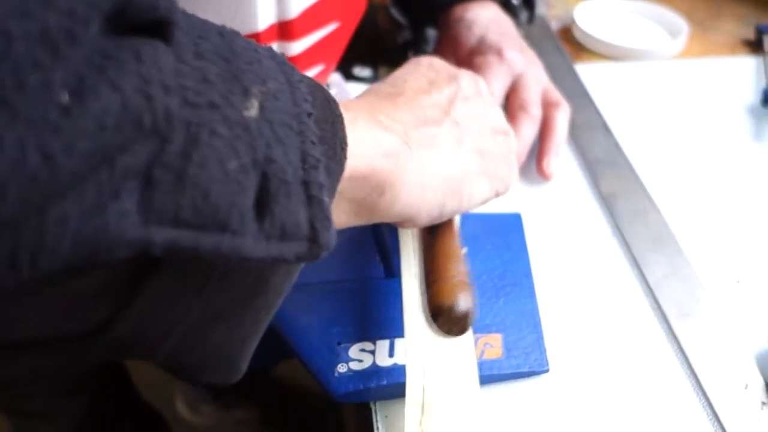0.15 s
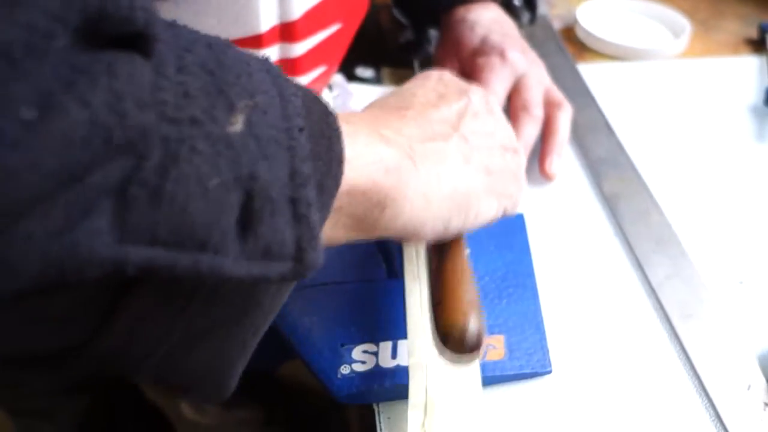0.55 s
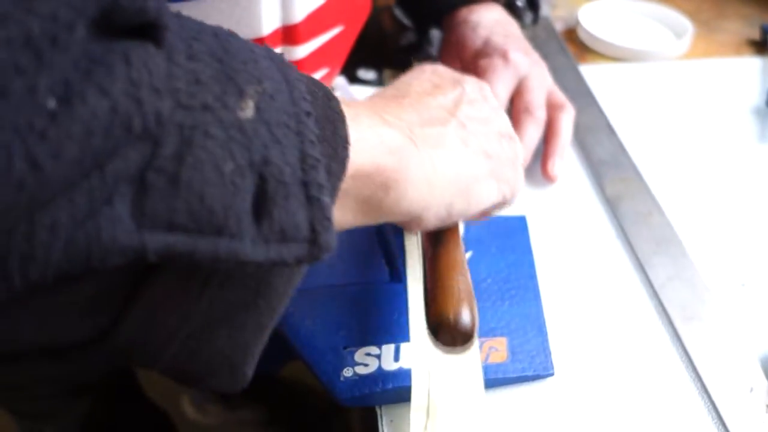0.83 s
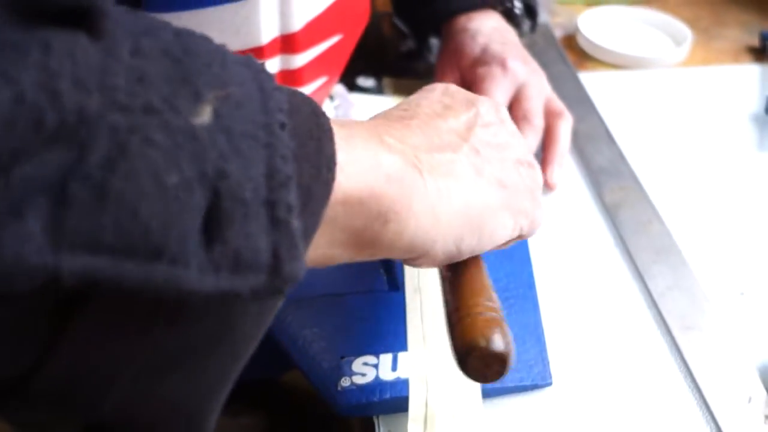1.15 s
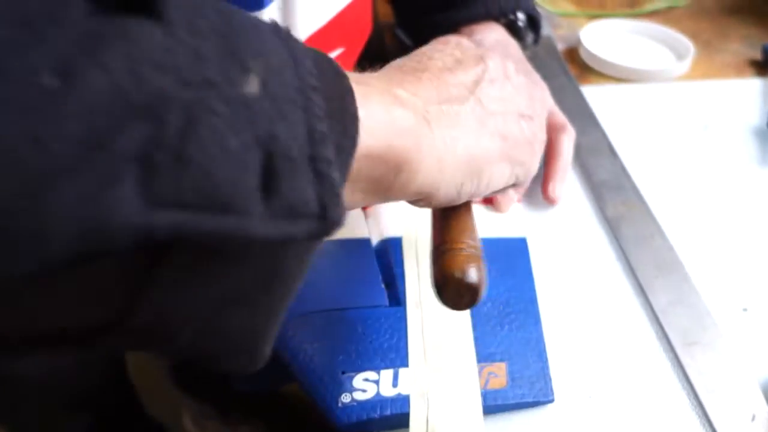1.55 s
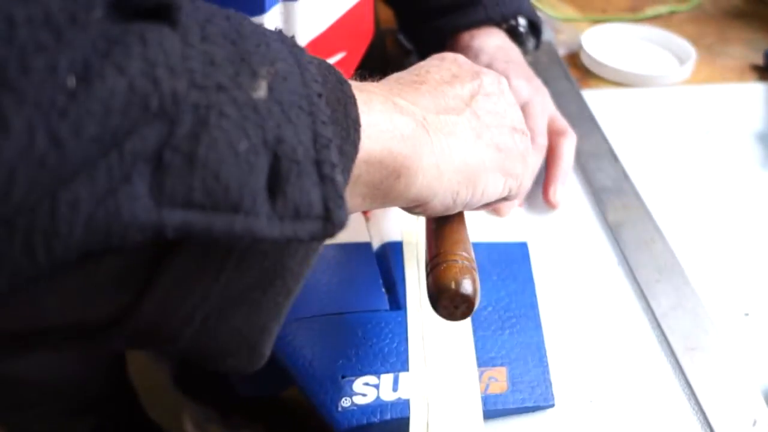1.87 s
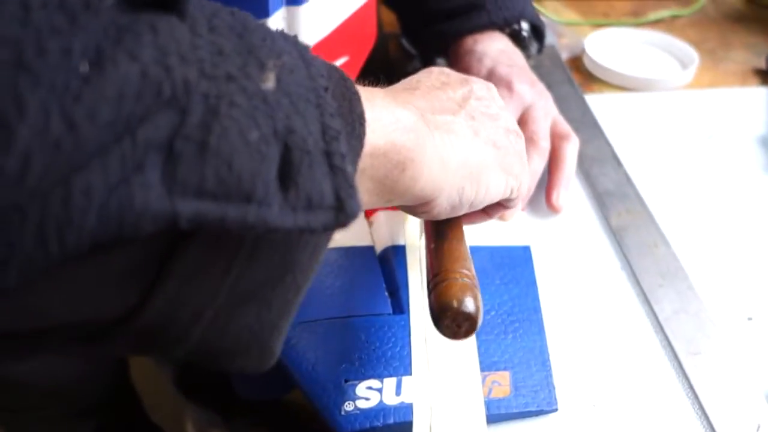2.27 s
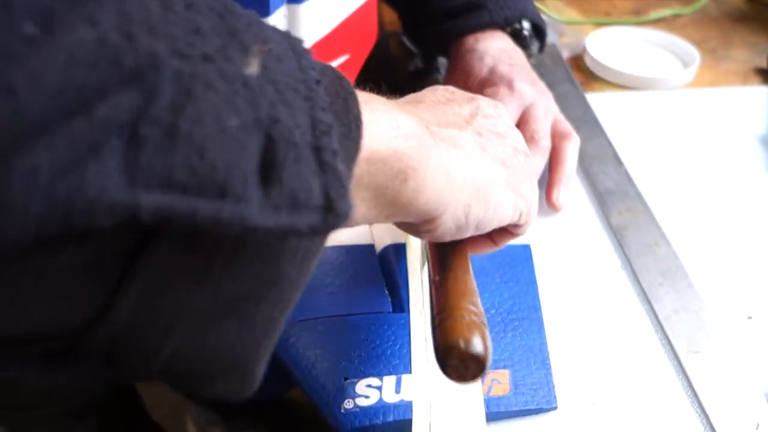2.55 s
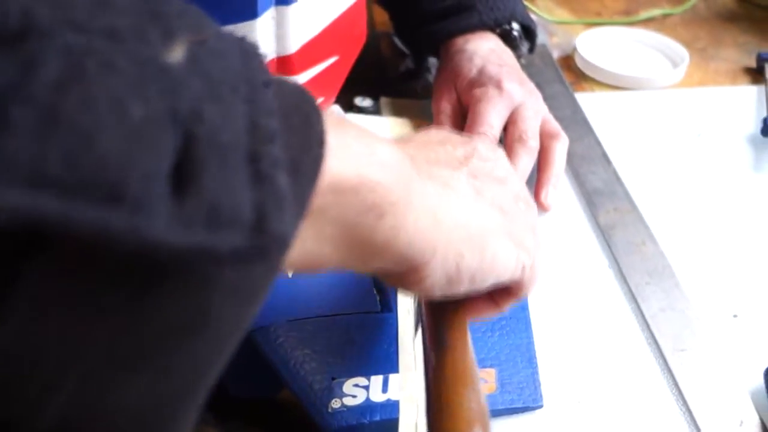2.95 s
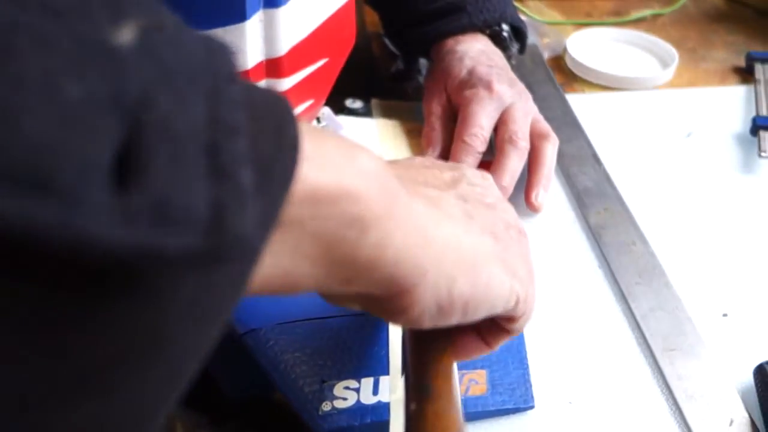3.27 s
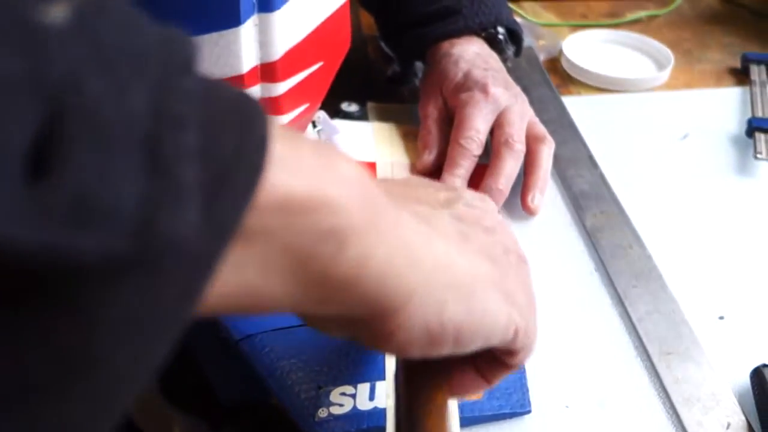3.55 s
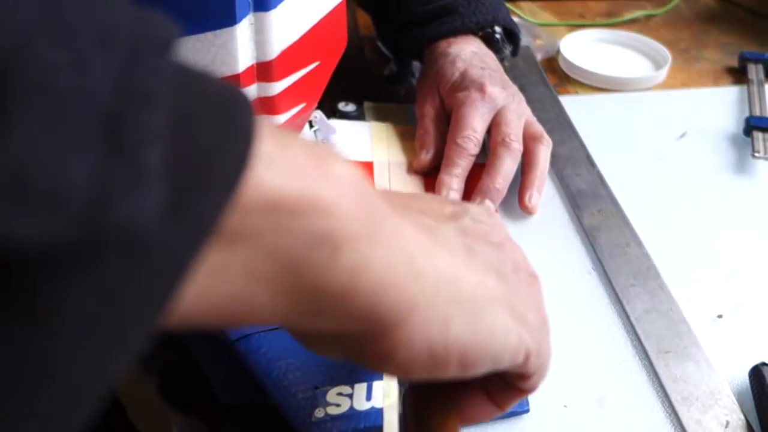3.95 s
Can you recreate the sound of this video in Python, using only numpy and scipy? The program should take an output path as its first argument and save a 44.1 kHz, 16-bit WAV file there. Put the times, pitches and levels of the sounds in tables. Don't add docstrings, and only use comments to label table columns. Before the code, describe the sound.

Bright, dry, grainy saw strokes come first, irregular and fast, with clicks of thin steel against the slot. After about a half-second lull with faint tapping, the blade clatters back in and scrapes more softly and duller, finishing with light pointed scratches and near quiet. Under it lies a faint low engine drone and steady fan hum in a small room, captured closely in stereo.

```python
import sys
import numpy as np
from scipy import signal
from scipy.fft import rfft, irfft, next_fast_len
from scipy.io import wavfile
from scipy.ndimage import uniform_filter1d, map_coordinates

SR = 44100
rng = np.random.default_rng(int(sys.argv[2]) if len(sys.argv) > 2 else 0)


def to_linear_factor(level_db):
    exponent = np.asarray(level_db, float) / 20
    return 10 ** exponent


def master_out(mix):
    frames = np.transpose(np.atleast_2d(mix))
    ceiling = np.clip(frames, -1, 1)
    pcm = np.round(ceiling * 32767).astype(np.int16)
    wavfile.write(sys.argv[1], SR, pcm)


N = 181017
TIME = np.arange(N) / SR

# t/s, f/Hz
FIRING_CYCLE = [(0.0, 19.3), (0.04, 19.2), (0.55, 19.0), (1.54, 19.0), (1.97, 18.7), (2.92, 18.6),
                (3.0, 18.7), (4.1, 19.1)]
# t/s, level/dB
ENGINE_BOOM = [(0, -54.5), (1, -46), (1.6, -47.5), (2, -42.5), (2.5, -45), (3.4, -43.5), (4.1, -48)]
# multiple of the firing cycle [1], level/dB
BOOM_ORDERS = [(5, 0.5), (6, -9)]
# multiple of the firing cycle [1], level/dB
STEADY_ORDERS = [(2, -89), (3, -73), (4, -81), (7, -114), (8, -62.5), (10, -63), (11, -88.5), (12, -76),
                 (14, -65.5)]

# f/Hz, density/dB per Hz
FLOOR_SPECTRUM = [(25, -10), (43, -17), (79, -6), (104, -3), (178, -10.5), (260, -14), (445, -23),
                  (722, -37), (1800, -30.5), (2600, -34.5), (3170, -42), (9810, -45.5), (13900, -55),
                  (15500, -80)]
# f/Hz, likeness [0..1]
FLOOR_LIKENESS = [(60, 1.0), (240, 1), (950, 0.41), (3770, 0.041), (15000, 0.01)]

# start/s, fastest/s, stop/s, hiss level/dB, pressure on the block/dB
STROKES = [(-.04, 0, 0.079, -39, 3), (0.054, 0.163, .24, -34, -2), (0.207, 0.26, .3, -38, -6.5),
           (0.268, 0.307, 0.35, -45, -2.5), (0.466, 0.518, 0.59, -31.5, -3),
           (0.591, 0.608, 0.63, -37.5, -8.5), (0.596, 0.699, .76, -36.5, -2),
           (0.806, 0.834, 0.88, -44, -1.5), (0.895, 1.011, 1.223, -33.5, -3.5),
           (0.968, 1.036, 1.105, -32.5, 1), (1.188, 1.224, 1.277, -36.5, -8),
           (1.276, 1.324, 1.37, -35.5, -8), (1.29, 1.375, 1.4, -34, -4)]
GROOVE_CUTS = [
    (2.192, 2.23, 2.27, -43.5, -10),
    (2.282, 2.3, 2.312, -46, -13),
    (2.314, 2.348, 2.38, -41, -13),
    (2.34, 2.403, 2.546, -39, -6),
    (2.426, 2.579, 2.686, -38, -2.5),
    (2.56, 2.725, 2.94, -40, 0),
    (2.788, 2.883, 3.027, -39.5, -3),
    (2.938, 3.053, 3.253, -39.5, -5.5),
    (3.098, 3.165, 3.273, -41, -2.5),
]
RESTING_CONTACT = [(.32, .37, 0.81, -65.5, 1), (.72, .77, 1.2, -66, 1), (1.115, 1.197, 1, -59, -18),
                   (1.23, 1.275, 1.46, -47, -4.5), (1.358, 1.4, 1.67, -63, 5.5),
                   (2.2, 2.293, 2.38, -57, -3), (3.297, 3.456, 3.6, -52.5, -1), (3.618, 3.74, 3.74, -53, 0),
                   (3.867, 3.93, 4.46, -69.5, 5)]
JABS = [(3.187, 3.317, 3.39, -50, -1.5), (3.344, 3.397, 3.456, -39, -2.5), (3.447, 3.512, 3.66, -44.5, -5),
        (3.53, 3.62, 3.75, -37.5, 0.5), (3.734, 3.837, 3.89, -41, -2), (3.81, 3.877, 3.95, -42, 0)]
# t/s, blade depth in slot/dB, hand weight on table/dB, free length of block/dB
SAW_POSE = [(0, 4, -8, -0.5), (.25, -7, -21, -3.5), (.55, -7, -8, -0.5), (1.05, -5.5, -8, 1.5),
            (1.24, -7, -12.5, 5), (1.35, -6.5, -18, -0.5), (2.25, -14, -9, 2.5), (2.55, -8, -19, -4),
            (2.75, -6, -8.5, -2.5), (3.05, -3.5, -6, -2.5), (3.22, 0.5, -0.5, 2), (3.4, 3, 1.5, 1),
            (3.62, 3.5, -4, 1.5), (3.72, 4, 5, 6.5), (3.85, 1.5, -1, 1.5)]

# f/Hz, density/dB per Hz
TEARING_SPECTRUM = [(1470, -32), (2500, -10), (2980, -19.5), (3840, -19), (4410, -13), (6990, -2),
                    (9360, -0.5), (11900, -3.5), (14700, -9.5), (15700, -11)]
# f/Hz, width/Hz, level/dB
BLADE_MODES = [(6050, 400, -0.5), (6870, 160, 6.5), (8560, 240, -1.5), (9600, 81, 4), (11470, 910, -7)]
# f/Hz, width/Hz, level/dB
GROOVE_MODES = [(3627, 460, 0), (4280, 410, 8), (5070, 1130, 0)]
# f/Hz, width/Hz, level/dB
BLOCK_MODES = [(820, 195, -3.5), (1266, 192, -0.5), (1703, 214, 0.5), (2280, 304, 1.5), (2892, 550, -2)]
# f/Hz, width/Hz, level/dB
TABLE_MODES = [(59, 23.5, -4.5), (130, 32, -4.5), (197, 75, -5), (286.8, 25, 4.5), (408.5, 97, -8.5)]

# t/s, peak level/dB, block part/dB
BLADE_TICKS = [(.0014, -9.5, 2), (.416, -36, -20), (.6, -21, -6), (.6055, -10, -18), (.7117, -14, -21),
               (.8116, -19.5, -11), (.833, -21, -24), (.917, -27.5, -19), (.9348, -18.5, -9),
               (1.2117, -15, -18), (1.2285, -23.5, 1.5), (1.3065, -20, -19), (1.3902, -14.5, -16),
               (2.2064, -31, -20), (2.2967, -22.5, -30), (2.329, -19, -30), (2.485, -41, -4),
               (2.5594, -14, -9), (2.6674, -30.5, 7.5), (2.7328, -22, 0), (2.778, -29, -3),
               (2.997, -17, -5), (3.3959, -28, 0), (3.4994, -28, 7), (3.5628, -24, 3), (3.669, -34, -4),
               (3.7885, -31, -1), (3.8412, -25, 4)]
BLADE_RATTLE = [(2.4, -26, -1), (2.4132, -21, -2), (2.4214, -8, -11.5), (2.4265, -14, -7),
                (2.4301, -16, -9), (2.444, -10.5, -13)]
SOFT_TAPS = [(1.871, -44, 0), (1.881, -47.5, 12), (1.9121, -49, -14), (2.007, -41.5, 8), (2.012, -43, 10),
             (2.0903, -46.5, 5), (2.1161, -45, -4), (2.143, -37.5, -5), (2.1914, -46, 6)]
# f/Hz, width/Hz, level/dB
KNOCK_MODES = [(1284, 79, 5), (1920, 550, 6), (2730, 1200, 5.5), (4570, 1100, 8)]
# f/Hz, width/Hz, level/dB
TAP_MODES = [(895, 120, -1), (1260, 60, 11.5), (1850, 270, 5.5), (2500, 680, -3), (4600, 430, -4)]

# f/Hz, likeness [0..1]
SAW_LIKENESS = [(60, 1), (180, 1), (550, 1), (1650, 0.75), (4970, 0.51), (15000, 0.4)]
# f/Hz, left minus right level/dB
SAW_LEAN = [(60, 6), (150, -2), (380, 0.5), (950, 0.5), (2380, -2.5), (5980, -4.5), (15000, -1.5)]
# f/Hz, phase/rad
SAW_LEAD = [(1800, 0), (7000, 0.22), (10000, 1), (15000, 0.96)]
# f/Hz, t60/s
SHOP_DECAY = [(200, 0.27), (1000, 1), (3000, 0.5), (8000, 0.38), (15000, 0.27)]


def unit(x):
    return x / np.sqrt(np.mean(x ** 2) + 1e-20)


def along(points, hz):
    f, v = np.transpose(points)
    return np.interp(np.log(hz + 1), np.log(f + 1), v)


def curves(rows):
    s, *columns = np.transpose(rows)
    return [np.interp(TIME, s, column) for column in columns]


def wobble(rate):
    knots = rng.standard_normal(int(N * rate / SR) + 4)
    return map_coordinates(knots, [np.arange(N) * rate / SR])


def filtered(x, response):
    m = next_fast_len(N + SR // 2)
    return irfft(rfft(x, m) * response(np.fft.rfftfreq(m, 1 / SR)), m)[..., :N]


def above(hz):
    return lambda f: (1j * f / (hz + 1j * f)) ** 4


def modes(table):
    def response(f):
        total = 0
        for k, (centre, width, db) in enumerate(table):
            damping = 1j * f * width
            total = total + (-1) ** k * to_linear_factor(db) * damping / (centre ** 2 - f * f + damping)
        return total
    return response


def ports(pair, alike, lean=((1, 0), (2, 0)), lead=((1, 0), (2, 0))):
    def spread(hz):
        turn = np.arccos(np.clip(along(alike, hz), -1, 1)) / 2
        return np.array([np.cos(turn), np.sin(turn)])

    def offset(hz):
        half = to_linear_factor(along(lean, hz) / 2) * np.exp(0.5j * along(lead, hz))
        return np.array([half, 1 / half])

    mid, side = filtered(pair, spread)
    return filtered(np.array([mid + side, mid - side]), offset)


def engine():
    angle = 2 * np.pi * (np.cumsum(curves(FIRING_CYCLE)[0]) / SR + 0.297)
    boom_db = curves(ENGINE_BOOM)[0]
    orders = [(k, db + boom_db) for k, db in BOOM_ORDERS]
    orders.append((9, -47 - 1.95 * TIME))
    orders += list(STEADY_ORDERS)
    drone = 0
    for k, db in orders:
        level = to_linear_factor(db + 1.34 * wobble(3.05))
        drone = drone + level * np.cos(round(k) * angle + 0.33 * wobble(4.53))
    fan = to_linear_factor(-56.5 + 1.1 * wobble(2.5)) * np.sin(2 * np.pi * 52.5 * TIME)
    return np.sqrt(2) * (drone + fan)


def floor():
    air = unit(filtered(rng.standard_normal((2, N)), lambda f: to_linear_factor(along(FLOOR_SPECTRUM, f))))
    return to_linear_factor(-49 + 1.2 * wobble(5.65)) * ports(air, FLOOR_LIKENESS)


def stroke(start, fastest, stop):
    u = np.interp(TIME, [start, fastest, stop], [0, 1, 2])
    steepness = np.where(u < 1, 1.52, 1.28)
    return np.abs(np.sin(np.pi / 2 * u)) ** steepness


def jab(start, fastest, stop):
    return np.interp(TIME, [start, fastest, stop], [0, 1, 0]) ** 1.43


def tearing(scatter_db, chatter_db):
    scatter = scatter_db * np.minimum(rng.exponential(size=N), 3.5)
    chatter = chatter_db * (wobble(45) + wobble(160))
    return to_linear_factor(scatter + chatter) * rng.standard_normal((2, N))


def rasp():
    moves = [(stroke, row) for rows in (STROKES, GROOVE_CUTS, RESTING_CONTACT) for row in rows]
    moves += [(jab, row) for row in JABS]
    hiss_power, pressed_power = 0, 0
    for shape, (start, fastest, stop, hiss_db, pressure_db) in moves:
        power = shape(start, fastest, stop) ** 2 * to_linear_factor(2 * hiss_db)
        hiss_power = hiss_power + power
        pressed_power = pressed_power + power * to_linear_factor(2 * pressure_db)
    hiss, pressed = np.sqrt(hiss_power), np.sqrt(pressed_power)
    lag_s, smear_s = 0.019, 0.052
    smeared = uniform_filter1d(hiss, int(smear_s * SR))
    late = np.pad(smeared, (int(lag_s * SR), 0), "edge")[:N]

    depth_db, weight_db, free_db = curves(SAW_POSE)
    cells = tearing(scatter_db=3.5, chatter_db=1.0)
    steel = lambda f: to_linear_factor(along(TEARING_SPECTRUM, f)) * (1 + 0.57 * np.abs(modes(BLADE_MODES)(f)))
    blade = unit(filtered(cells, steel))
    groove = unit(filtered(cells, lambda f: modes(GROOVE_MODES)(f) * (f > 3000)))
    block = unit(filtered(cells, lambda f: modes(BLOCK_MODES)(f) * above(450)(f)))
    low_modes = filtered(block, lambda f: 1 / (1 + (f / 1400) ** 6))
    block = block + (to_linear_factor(free_db) - 1) * low_modes
    table = unit(filtered(tearing(scatter_db=2.5, chatter_db=1.0), modes(TABLE_MODES)))
    return hiss * (blade + to_linear_factor(depth_db) * groove) + pressed * block + late * to_linear_factor(weight_db) * table


def bursts(rows, t60):
    steel, foam = np.zeros((2, 2 * N)), np.zeros((2, 2 * N))
    t = np.arange(SR // 20) / SR
    onset = 1 - np.exp(-t / 0.00077)
    for s, db, foam_db in rows:
        steel_noise, foam_noise = rng.standard_normal((2, 2, len(t))) * onset
        start = round(s * SR)
        span = slice(start, start + len(t))
        steel[:, span] += to_linear_factor(db + 2 - 60 * t / t60) * steel_noise
        foam[:, span] += to_linear_factor(db + foam_db - 60 * t / (t60 * 1.16)) * foam_noise
    return steel[:, :N], foam[:, :N]


def ticks():
    steel, foam = np.add(bursts(BLADE_TICKS, t60=0.0091), bursts(BLADE_RATTLE, t60=0.011))
    soft_steel, soft_foam = bursts(SOFT_TAPS, t60=0.017)
    ring = lambda f: to_linear_factor(along(TEARING_SPECTRUM, f)) * (0.88 + 0.82 * modes(BLADE_MODES)(f))
    depth_db = curves(SAW_POSE)[0]
    slot = filtered(steel * to_linear_factor(-13 + depth_db), modes(GROOVE_MODES))
    knock = filtered(foam, lambda f: modes(KNOCK_MODES)(f) * above(400)(f))
    tap = filtered(soft_foam, modes(TAP_MODES))
    return filtered(steel + soft_steel, ring) + slot + knock + tap


def shop(x):
    hz, t, z = signal.stft(rng.standard_normal((2, SR // 2)), SR, nperseg=256)
    decay = to_linear_factor(-60 * t / along(SHOP_DECAY, hz)[:, None])
    tail = signal.istft(z * decay, SR, nperseg=256)[1]
    delayed = np.pad(x, ((0, 0), (300, 0)))
    return signal.fftconvolve(delayed, tail / np.linalg.norm(tail[0]), axes=1)[:, :N]


def singing():
    from_s, to_s, rise_s, stop_s = 1.345, 1.392, 0.058, 0.012
    slips = rng.standard_normal((2, N)) * to_linear_factor(7.5 * np.tanh(wobble(150)))
    away = np.maximum((from_s - TIME) / rise_s, (TIME - to_s) / stop_s).clip(0)
    bending = modes([(6040, 520, -0.5), (6800, 120, 8)])
    return to_linear_factor(-33 - 24 * away) * unit(filtered(slips, bending))


def creak():
    from_s, to_s, edge_s = 2.878, 2.925, 0.013
    away = np.maximum(from_s - TIME, TIME - to_s).clip(0) / edge_s
    lowest = modes([(787, 45, 0)])
    return to_linear_factor(-51.5 - 20 * away) * unit(filtered(rng.standard_normal(N), lowest))


def scene():
    saw = ports(rasp() + ticks() + creak(), SAW_LIKENESS, SAW_LEAN, SAW_LEAD)
    song = ports(singing(), SAW_LIKENESS, SAW_LEAN, SAW_LEAD)
    tail = shop(saw + to_linear_factor(-10) * song)
    return to_linear_factor(-1.0) * saw + song + to_linear_factor(-15.5) * tail + engine() + floor()


def roll_off(x):
    return signal.sosfilt(signal.butter(12, 15810, fs=SR, output="sos"), x)


def record(dry):
    mix = filtered(dry, lambda f: above(22)(f) * (f < 15830))
    return roll_off(mix)


dry = scene()
out = record(dry)
master_out(out)
```